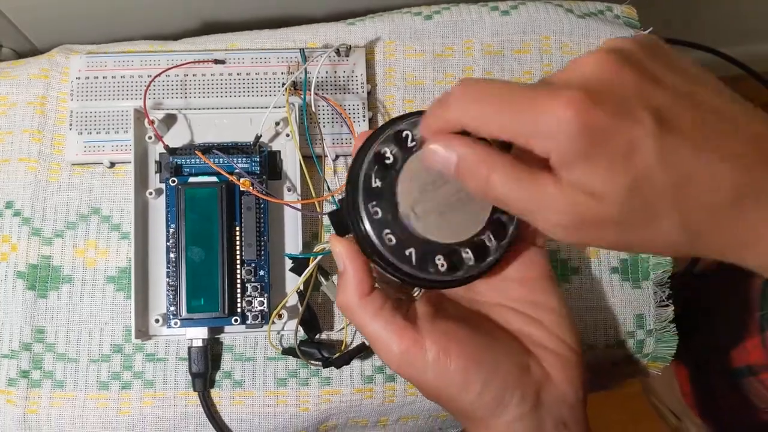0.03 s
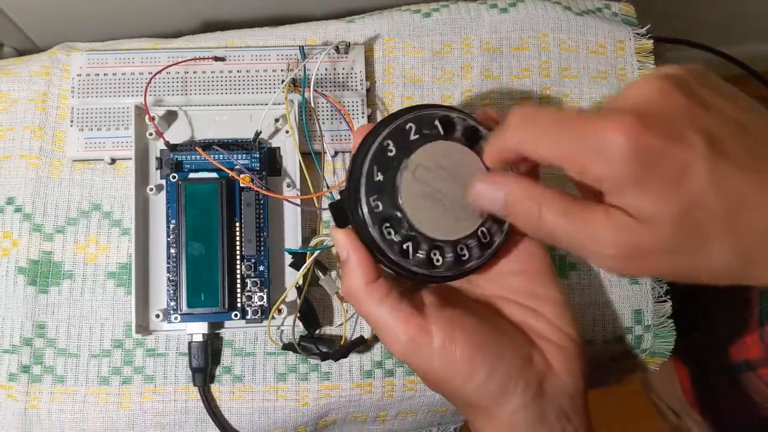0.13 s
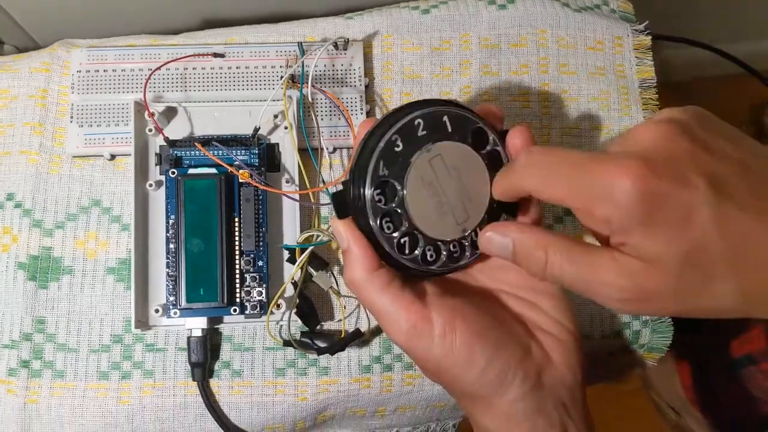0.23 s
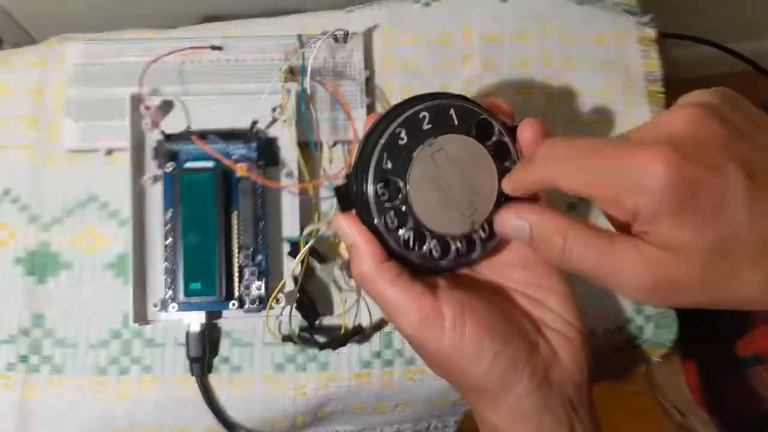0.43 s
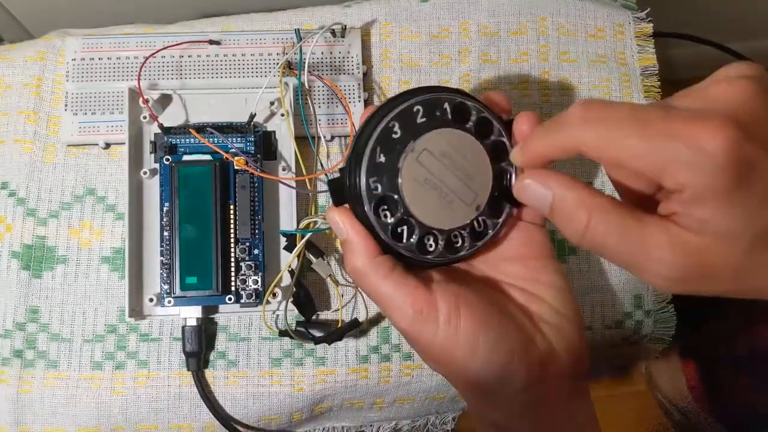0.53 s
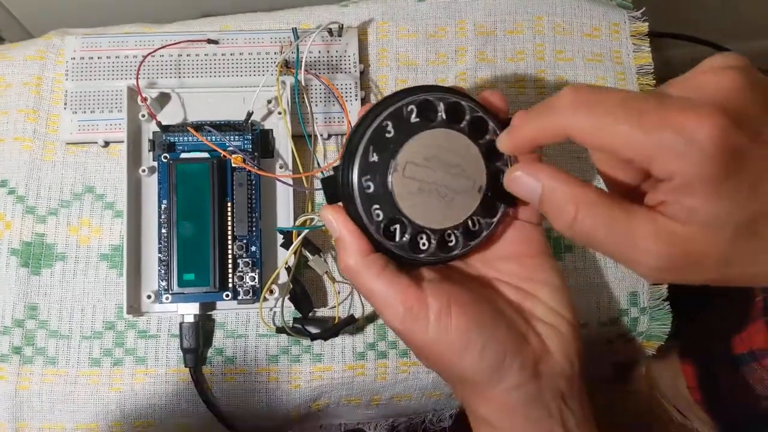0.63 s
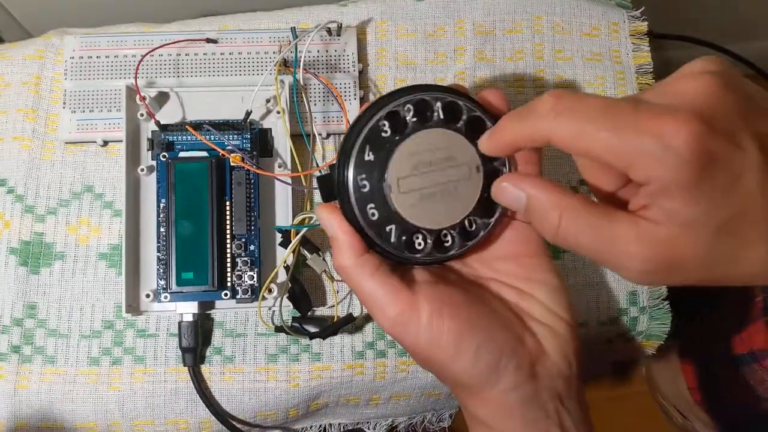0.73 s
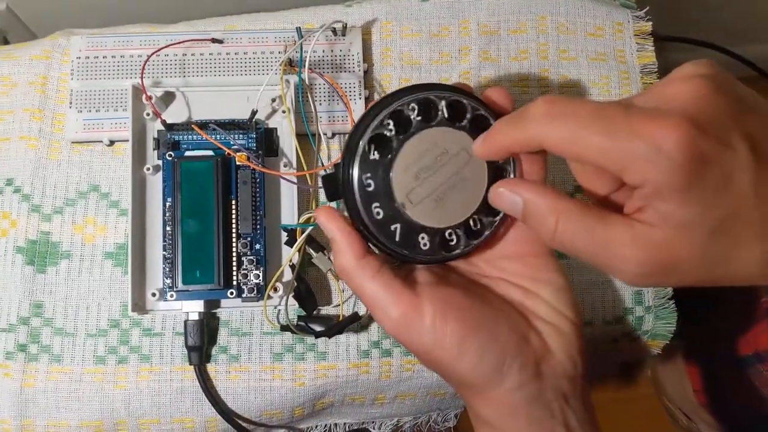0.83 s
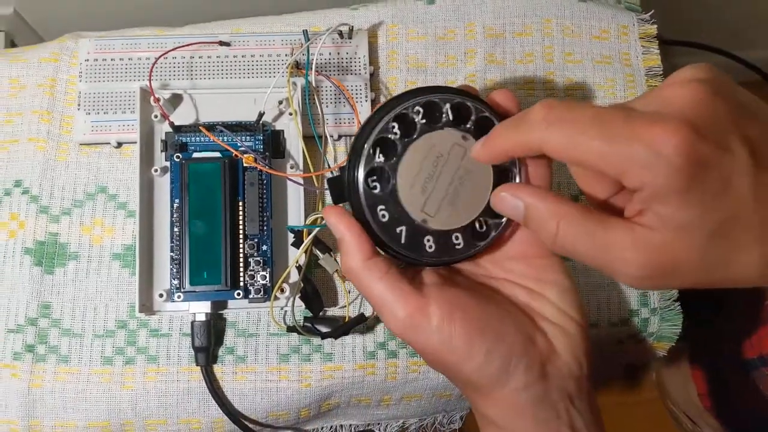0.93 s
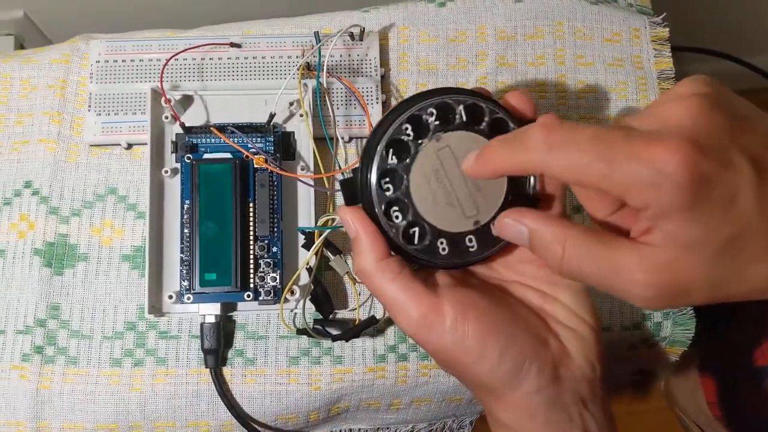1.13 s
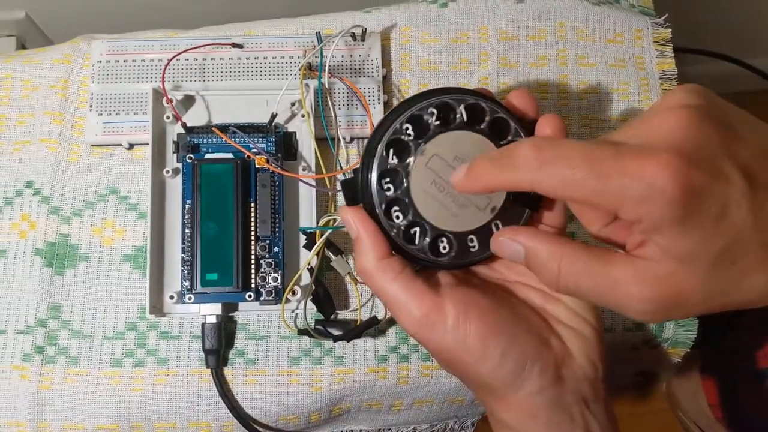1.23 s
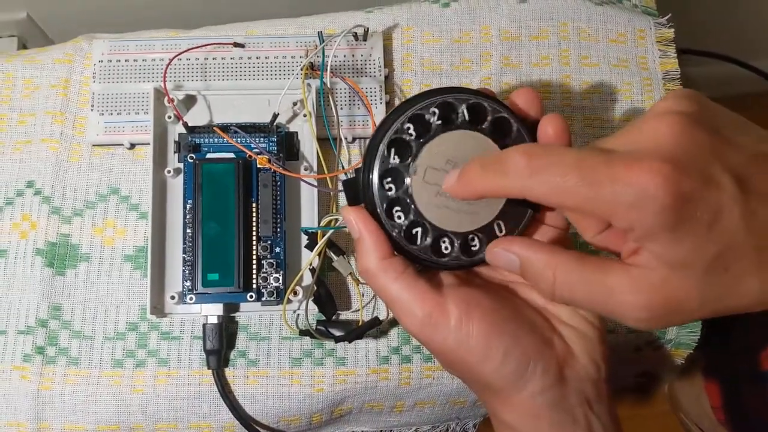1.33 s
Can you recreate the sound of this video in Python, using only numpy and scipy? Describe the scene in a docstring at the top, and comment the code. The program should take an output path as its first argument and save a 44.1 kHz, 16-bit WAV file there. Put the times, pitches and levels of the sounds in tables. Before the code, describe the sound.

A rotary telephone dial, held close to the microphone in a quiet room, is wound with light ratcheting and dull handling bumps. It hits the finger stop with a sharp double click, then whirs back, ticking evenly.

```python
"""A rotary telephone dial, held in the hand close to a stereo microphone in a quiet room.
It is wound with a light ratcheting, a pawl scraping over teeth, and dull handling bumps.
It meets the finger stop with a sharp double click that rings the hollow housing, then runs back:
the governor's brake throbs, the gears whir and the pulse contacts tick ten times a second."""
import sys
import numpy as np
from scipy import signal
from scipy.fft import rfft, irfft
from scipy.io import wavfile
from scipy.ndimage import uniform_filter1d

SR = 44100
rng = np.random.default_rng(int(sys.argv[2]) if len(sys.argv) > 2 else 0)


def unload_wav(signal):
    """Save mono or channel-first audio to the path in sys.argv[1] as 16-bit WAV at rate SR, clipped to [-1, 1]."""
    wavfile.write(
        sys.argv[1],
        SR,
        np.round(np.clip(np.atleast_2d(signal).T, -1, 1) * 32767).astype(np.int16),
    )


N = 61739
T = np.arange(N) / SR
FREQS = np.arange(N + 1) * SR / (2 * N)

# likeness of noise on the two sides of the microphone (frequency [Hz], correlation [0-1])
STEREO_LIKENESS = [(100, 0.49), (950, 0.62), (1600, 0.37), (4000, 0.24), (6000, 0.5), (14000, 1)]
# room tone (frequency [Hz], relative level [dB])
ROOM_COLOUR = [(15, 7), (35, 8.5), (70, -24), (200, -32), (500, -9), (2000, -31.5), (9000, -43),
               (15000, -32)]
# pawl scraping each tooth (time [s], hiss level [dB], ring level [dB])
RATCHET_TEETH = [(0.018, -57, -63), (.055, -60.5, -70), (.090, -60.5, -54), (0.129, -62.5, -65),
                 (0.174, -58.5, -61.5), (0.213, -53.5, -54), (0.247, -59, -56), (0.301, -55.5, -46.5),
                 (0.313, -61, -51.5)]
# wheel sliding round (time [s], level [dB])
SLIDE_LEVEL = [(0, -62.5), (.12, -61), (.26, -62.5), (.33, -65.5), (.39, -67.5), (.41, -70.5)]
# hiss of wheel and teeth (frequency [Hz], relative level [dB])
SCRAPE_COLOUR = [(350, -36), (600, 1.5), (754, -9.5), (988, 5), (1380, -23), (2160, -12), (2980, -2),
                 (4460, -9.5), (6340, -6.5), (9750, -9), (12600, -28.5), (15000, -24)]
# ring of the pawl (frequency [Hz], width [Hz], relative level [dB])
PAWL_MODES = [(863, 250, 2.5), (2840, 700, -1.5), (3660, 220, -3)]
# bumps of the hand (time [s], peak level [dB], softness [time stretch])
HAND_BUMPS = [(0.113, -37.5, 2.6), (0.2089, -24, 0.75), (0.2096, -24, 2.07), (0.2601, -21, 1.17),
              (0.2831, -22.5, 1.04), (0.304, -37, 2.1), (.3368, -20.5, 0.86), (0.3668, -18.5, 0.72),
              (.394, -20, 0.76), (0.4332, -27.5, 0.93), (0.4725, -22.5, 1.04), (.573, -47, 1.3),
              (0.6136, -26, 0.79), (0.6446, -22, 0.98)]
# finger rubbing (time [s], level [dB])
FINGER_LEVEL = [(.31, -61.5), (.34, -54), (.39, -45.5), (.41, -73), (.48, -61.5), (.51, -40.5),
                (.56, -59.5), (.62, -60.5)]
# finger rub, also the stop's rattle (frequency [Hz], relative level [dB])
RUB_COLOUR = [(300, 11.5), (1200, 1.5), (3500, -4.5), (6000, -8), (10000, -29), (15000, -22)]
# bumps and knocks across the microphone (frequency [Hz], phase lead of the left [rad])
LEFT_LEAD = [(20, 0.3), (60, -0.6), (125, -1.93), (250, -2), (550, -2.5), (1200, -1.5)]
# their extra colouring on the right (frequency [Hz], gain [dB])
RIGHT_COLOUR = [(20, -6), (60, -2.5), (125, -5.5), (300, -1.5), (1000, -1.5)]
# knocks at the finger stop (time [s], thump level [dB], softness [time stretch],
# push direction [sign], housing level [dB], snap level [dB], right gain [dB])
STOP_KNOCKS = [(0.3724, -36, 0.64, 1, -17, -32, -5.5), (0.4965, -5.5, 0.53, 1, -7, -7, 3.5),
               (0.5174, -4.5, 0.52, -1, -22, -5.5, -1.5)]
# hollow ring of the housing (frequency [Hz], width [Hz], relative level [dB])
HOUSING_MODES = [(532, 167, 3.5), (854, 254, -6)]
# anti-resonances of the housing (frequency [Hz], width [Hz])
HOUSING_NOTCHES = [(450, 144), (1150, 89), (1950, 330), (4900, 470)]
# snap of the stop (frequency [Hz], width [Hz], relative level [dB])
SNAP_MODES = [(1490, 810, 1.5), (2350, 490, 1.5), (3080, 410, 0), (3875, 500, -1.5), (5360, 460, -1.5),
              (7630, 370, -17.5), (9830, 300, -20.5), (11700, 290, -21)]
# governor's ring, overshooting as it spins up, then settling (time [s], pitch [Hz])
GOVERNOR_PITCH = [(.58, 900), (.65, 1005), (.74, 955), (1.4, 956)]
# strength of the brake's throb (time [s], relative level [dB])
BRAKE_LEVEL = [(.6, -6.5), (.66, 2), (.72, -2), (.76, -7.5), (.86, 1.5), (.92, -10.5), (.98, -1),
               (1.09, -7), (1.14, 2), (1.27, -5), (1.33, 0), (1.4, -5.5)]
# broad whir of the gears (frequency [Hz], relative level [dB])
WHIR_COLOUR = [(180, -59), (300, -34), (590, -20.5), (744, -11), (953, -4.5), (1300, -28.5), (2320, -21.5),
               (2690, -16), (4880, -23), (5760, -25), (9290, -24.5), (11000, -32.5), (15500, -51)]
# resonances of the running gears (frequency [Hz], width [Hz], level [dB])
GEAR_MODES = [(577, 80, -67.5), (985, 160, -62), (3170, 1020, -66), (5677, 130, -72.5), (7450, 480, -74),
              (9250, 170, -69)]
# flicks of the pulse contacts (time [s], level [dB])
CONTACT_TICKS = [(.789, -53), (0.891, -54.5), (0.986, -54), (1.086, -55.5), (1.1854, -55), (1.285, -53.5),
                 (1.385, -52.5)]
# scratch of a contact (frequency [Hz], relative level [dB])
SCRATCH_COLOUR = [(1200, -34), (2800, 0.5), (4000, 0), (4800, -26), (5700, 7), (6600, -9.5), (9200, -2.5),
                  (11000, -8.5), (15000, -15.5)]
# ring of the contact springs (frequency [Hz], relative level [dB], t60 [s])
SPRING_MODES = [(2660, 8, 0.12), (3083, 3, 0.17), (5770, -7, 0.077), (7500, 1, 0.045)]


def undb(db):
    """Decibels to gain."""
    return 10 ** (np.asarray(db) / 20)


def curve(points, at=T):
    """A (time, value) curve, by default at every sample."""
    return np.interp(at, *np.array(points).T)


def over_hz(points):
    """A (frequency, value) curve at every frequency."""
    hz, value = np.array(points).T
    return np.interp(np.log(FREQS + 1), np.log(hz), value)


def filtered(x, response):
    """Apply a frequency response."""
    return irfft(rfft(x, 2 * N) * response)[..., :N]


def low(hz, q):
    """Two-pole low-pass response."""
    s = 1j * FREQS / hz
    return 1 / (1 + s / q + s * s)


def high(hz, q):
    """Two-pole high-pass response."""
    return low(hz, q) * (1j * FREQS / hz) ** 2


def band(hz, width):
    """Two-pole band-pass response."""
    return low(hz, hz / width) * 1j * FREQS * width / hz ** 2


def resonances(modes):
    """Steep-sided response of damped resonances."""
    return sum(undb(db) * band(hz, width) ** 2 for hz, width, db in modes)


def noise(response):
    """Coloured stereo noise of rms 1, partly alike left and right."""
    alike = np.clip(over_hz(STEREO_LIKENESS), 0, .99)
    mid = filtered(rng.standard_normal(N), response * np.sqrt(1 + alike))
    side = filtered(rng.standard_normal(N), response * np.sqrt(1 - alike))
    out = np.array([mid + side, mid - side])
    return out / out.std()


def wander(rate_hz):
    """Smooth random wander with spread 1."""
    size = int(SR / rate_hz)
    out = uniform_filter1d(uniform_filter1d(rng.standard_normal(N), size), size)
    return out / out.std()


def placed(x, start, db):
    """A sound moved to its start time, with its peak at db."""
    return np.interp(T - start, T, x, left=0) * undb(db) / np.abs(x).max()


def ring(hz, t60):
    """One mode dying away after a blow."""
    return np.sin(2 * np.pi * hz * T) * np.exp(-np.log(1000) * T / t60)


def bursts(events, attack_s, decay_s):
    """Envelope with a quick rise and an exponential fall for each (time, level)."""
    return sum(undb(db) * np.clip((T - s) / attack_s, 0, 1)
               * np.exp(-np.maximum(T - s - attack_s, 0) / decay_s) for s, db in events)


def impulse(response):
    """One impulse through a response."""
    return irfft(response)[:N]


def at_microphone(x, right_db=0):
    """Bumps and knocks reach the right side earlier and with little treble."""
    shade = np.abs(low(970, .68)) ** 2 + undb(-31.5)
    right = shade * undb(over_hz(RIGHT_COLOUR) + right_db) * np.exp(-1j * over_hz(LEFT_LEAD))
    return np.array([x, filtered(x, right)])


def room_tone():
    """The quiet room behind the dial: a faint, steady rumble and hush."""
    return undb(-64) * noise(undb(over_hz(ROOM_COLOUR)))


def winding(attack_s=.004, decay_s=.0071, grain_db=1.8):
    """The wheel slides round and the pawl scrapes over one tooth after another."""
    scrapes = bursts([(s, db) for s, db, _ in RATCHET_TEETH], attack_s, decay_s)
    rings = bursts([(s, db) for s, _, db in RATCHET_TEETH], attack_s, decay_s)
    grain = undb(grain_db * wander(340))
    hiss = noise(undb(over_hz(SCRAPE_COLOUR)) * high(590, 1) ** 2)
    pawl = noise(resonances(PAWL_MODES))
    return grain * ((scrapes + undb(curve(SLIDE_LEVEL))) * hiss + rings * pawl)


def thump(soft):
    """A dull push on the hand-held body; softer pushes last longer."""
    dullness = low(259 / soft, .65) * low(406 / soft, .8) ** 2
    return -impulse(dullness * high(70.3, .94) * high(35.15, 1))


def handling():
    """Soft bumps, a finger rubbing on the left, and the dial rocking in the hand after the stop."""
    bumps = sum(placed(thump(soft), s, db) for s, db, soft in HAND_BUMPS)
    rub = undb(curve(FINGER_LEVEL)) * noise(undb(over_hz(RUB_COLOUR)))[0]
    sway = placed(ring(hz=28.3, t60=.23), start=.521, db=-28)
    return at_microphone(bumps + rub + sway)


def finger_stop():
    """Each knock thumps the body, rings the hollow housing, snaps the stop and rattles briefly."""
    housing = impulse(resonances(HOUSING_MODES))
    snap = impulse(resonances(SNAP_MODES))
    after_ring = ring(hz=3480, t60=.11)
    rattle = noise(undb(over_hz(RUB_COLOUR)))[0]
    notches = np.prod([1 - band(hz, width) for hz, width in HOUSING_NOTCHES], axis=0)
    top_cut = 1 / (1 + (FREQS / 12500) ** 20)
    out = 0
    for s, thump_db, soft, direction, housing_db, snap_db, right_db in STOP_KNOCKS:
        knock = direction * placed(thump(soft), s, thump_db)
        knock -= placed(housing, s + .000774, housing_db)
        knock -= placed(snap, s + .0008, snap_db)
        knock += placed(after_ring, s, snap_db - 37)
        knock += rattle * bursts([(s, snap_db - 14.5)], attack_s=.0024, decay_s=.0024)
        out += at_microphone(filtered(knock, notches * top_cut), right_db)
    return out


def gears(brake_rubs, swell_db=.8, flicker_db=.74):
    """The running gears whir, flickering and swelling a little at each rub of the brake."""
    whir = undb(-57.5) * noise(undb(over_hz(WHIR_COLOUR)) * high(487, .9) ** 3)
    for hz, width, db in GEAR_MODES:
        whir += undb(db) * noise(band(hz, width) ** 2)
    return whir * undb(swell_db * brake_rubs + flicker_db * wander(270))


def governor(release_s=.545, run_up_s=.041, turn_s=.0295, rub_s=.004):
    """The brake rubs once a turn, swelling a ring near 1 kHz; the gears whir beneath it."""
    turns = np.arange(-1, 27)
    times = .631 + turn_s * turns + .00002 * turns ** 2  # slowing slightly
    throbs, rubs = 0, 0
    for s in times:
        strength, detune, phase = rng.standard_normal(3)
        rub = np.exp(-.5 * ((T - s) / rub_s) ** 2)
        hz = curve(GOVERNOR_PITCH, at=s) * (1 + .012 * detune)
        throbs += rub * undb(.8 * strength) * np.sin(2 * np.pi * (hz * (T - s) + phase))
        rubs += rub
    run_up = np.clip((T - release_s) / run_up_s, 0, 1) ** .5
    return run_up * (gears(rubs) + throbs * undb(curve(BRAKE_LEVEL) - 45))


def contacts(attack_s=.0015, grain_db=2):
    """The cam flicks the contact springs: a short scratch and a thin ring."""
    flicks = bursts(CONTACT_TICKS, attack_s, decay_s=.016) * undb(grain_db * wander(900))
    scratch = flicks * noise(undb(over_hz(SCRATCH_COLOUR)) * high(1100, .92))
    springs = sum(undb(db) * ring(hz, t60) for hz, db, t60 in SPRING_MODES)
    return scratch + sum(placed(springs, s + attack_s, db + 5) for s, db in CONTACT_TICKS)


def scene():
    """One digit dialled close to the microphone, over the room tone."""
    return handling() + finger_stop() + winding() + governor() + contacts() + room_tone()


def record(dry, top_hz=15850):
    """The recorder cuts the highest treble steeply."""
    return signal.sosfilt(signal.ellip(10, .1, 90, top_hz, fs=SR, output="sos"), dry)


dry = scene()
out = record(dry)
unload_wav(out)
```